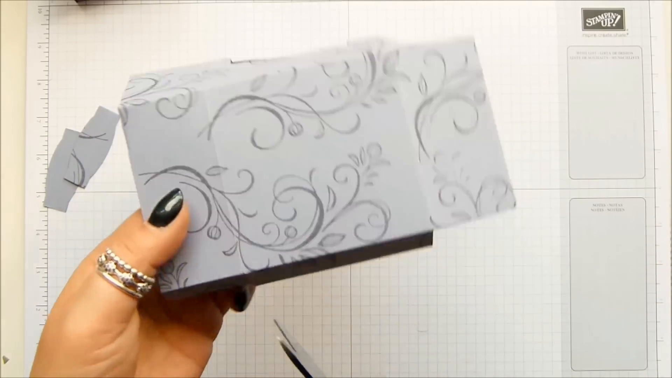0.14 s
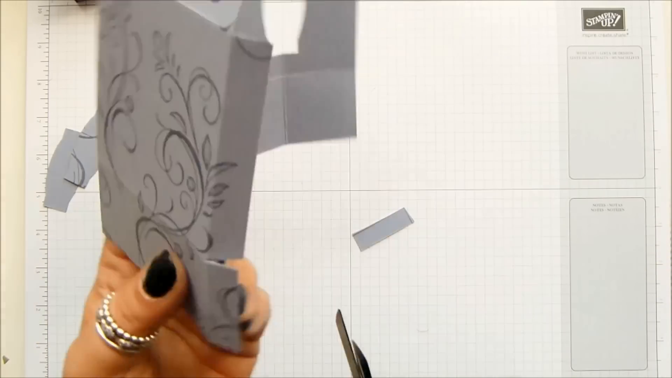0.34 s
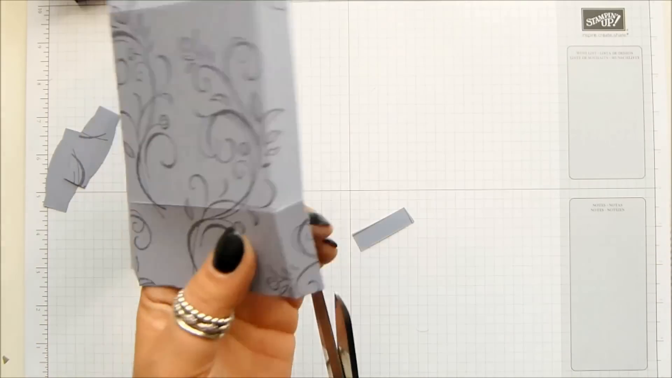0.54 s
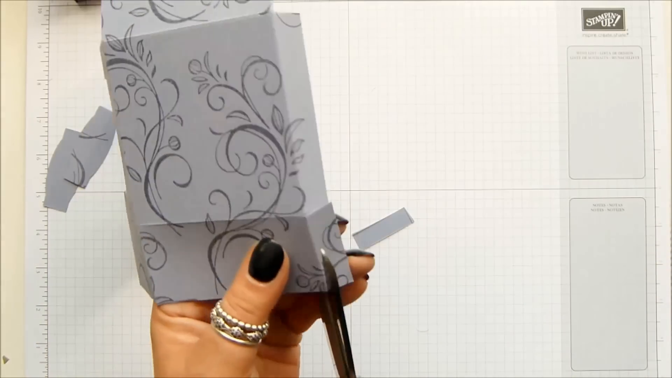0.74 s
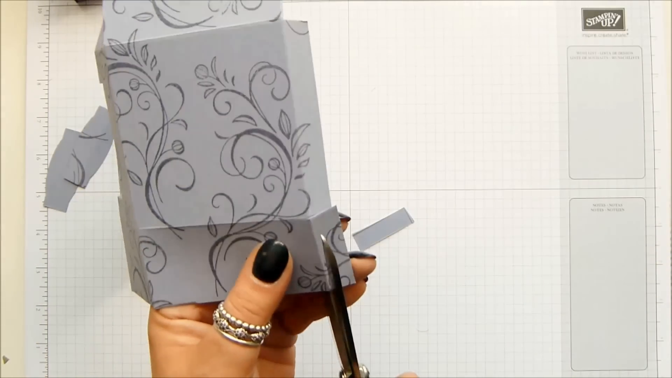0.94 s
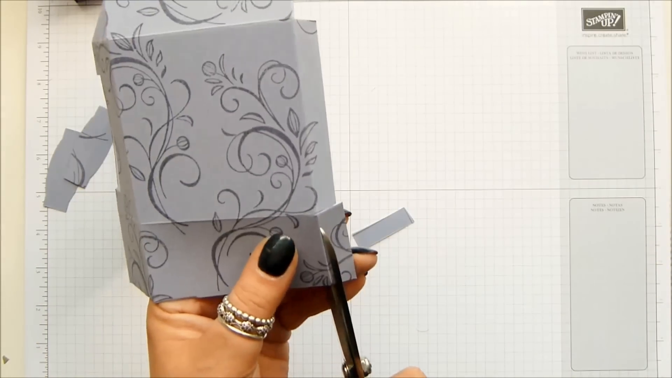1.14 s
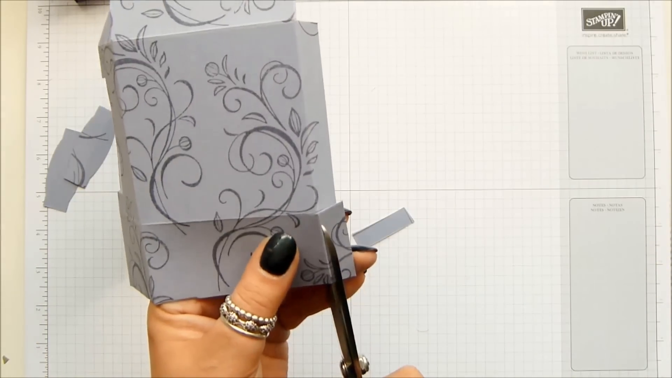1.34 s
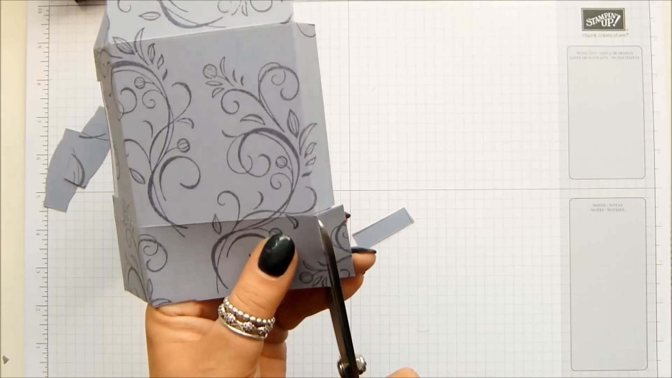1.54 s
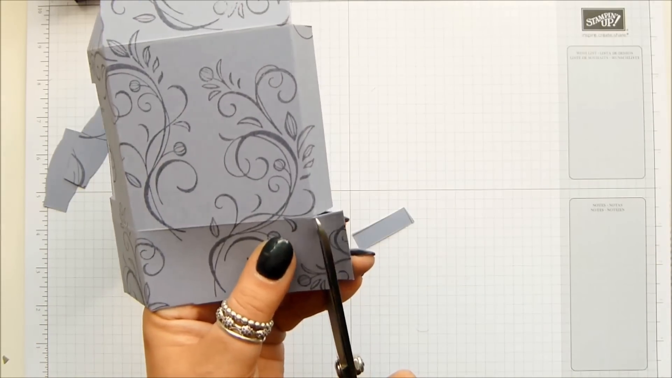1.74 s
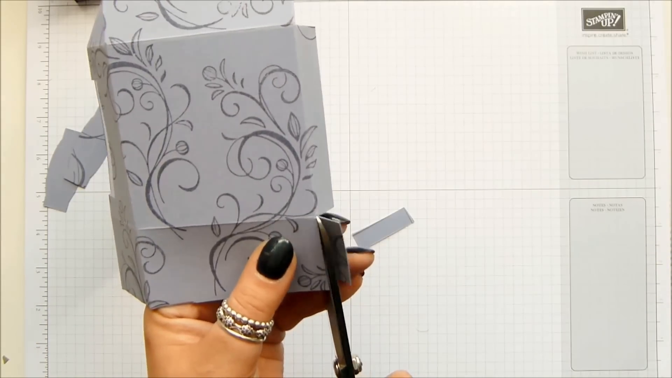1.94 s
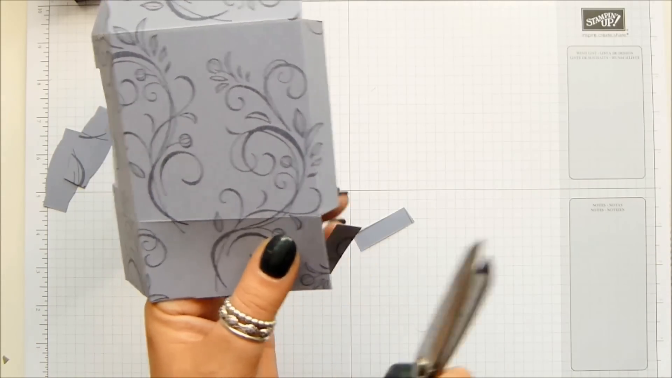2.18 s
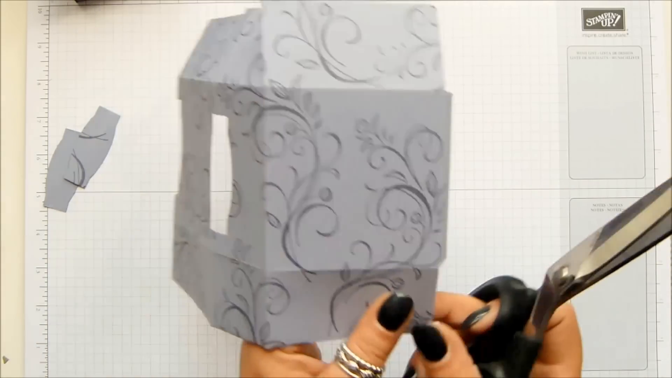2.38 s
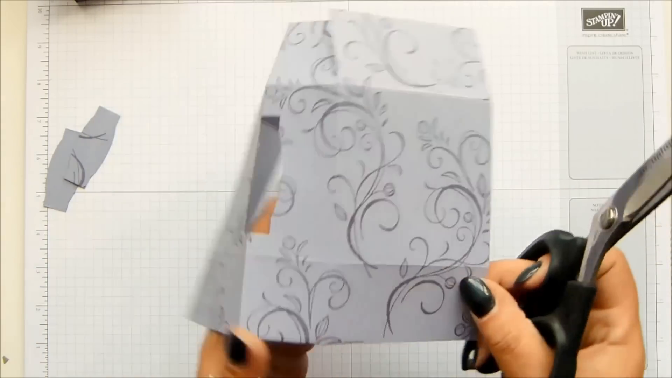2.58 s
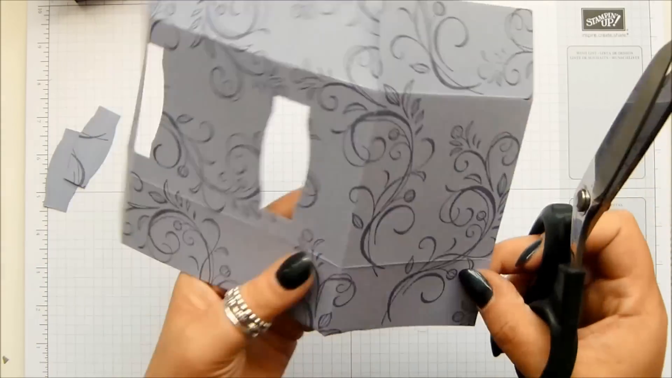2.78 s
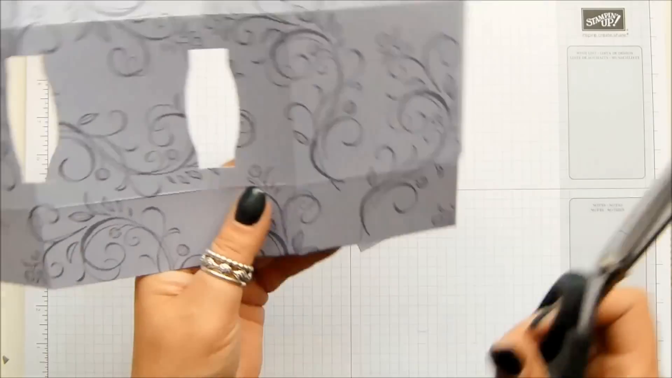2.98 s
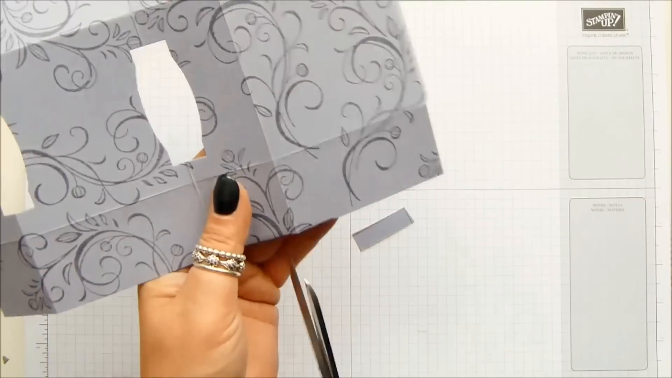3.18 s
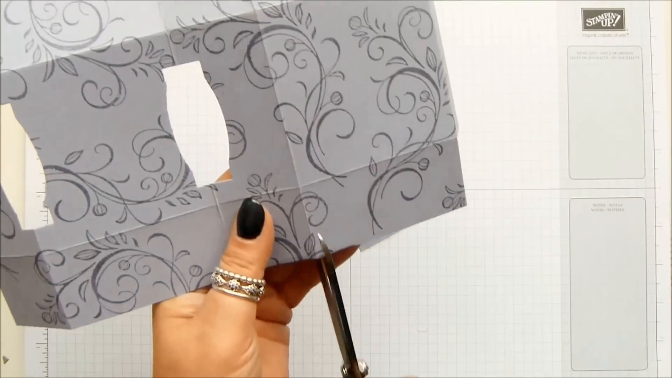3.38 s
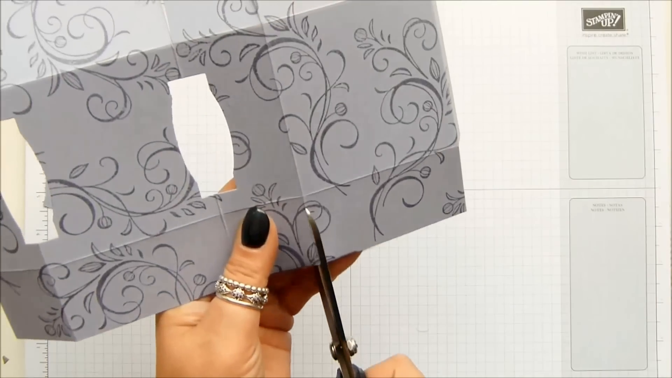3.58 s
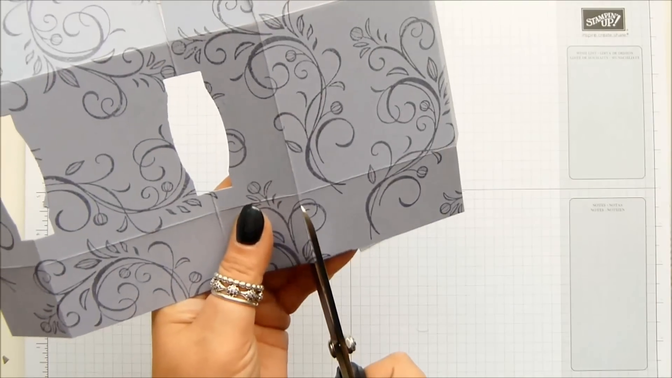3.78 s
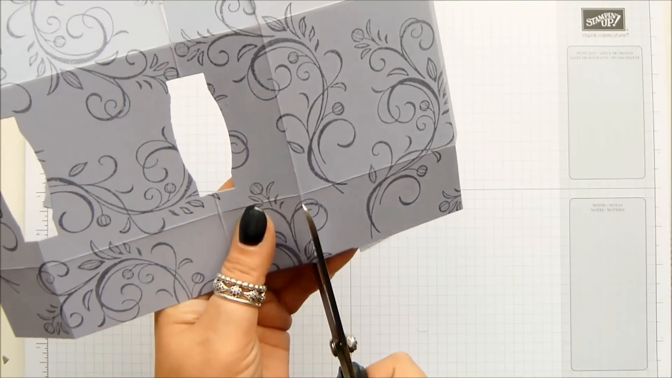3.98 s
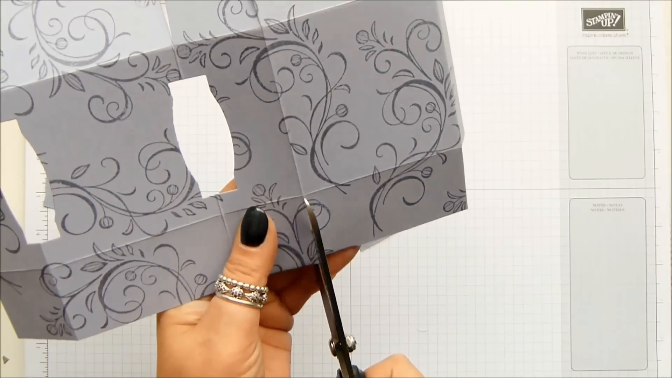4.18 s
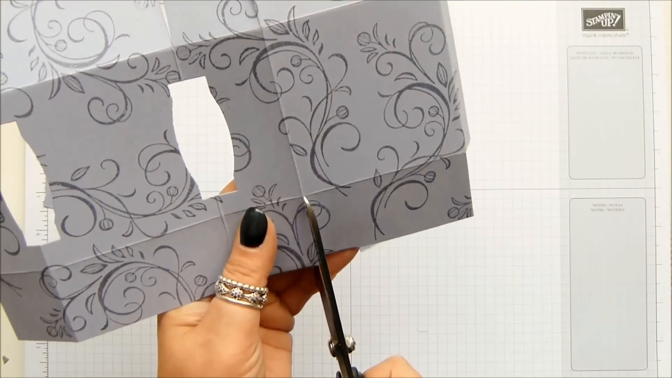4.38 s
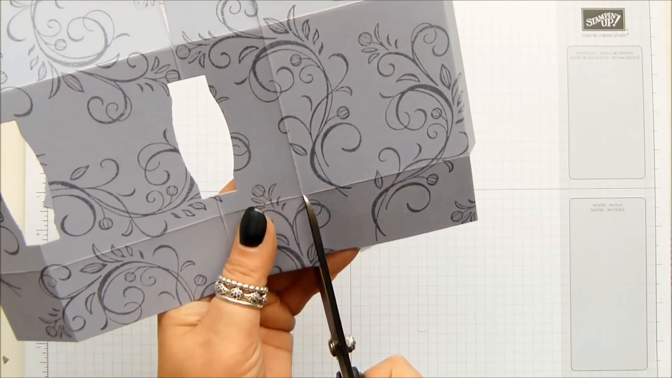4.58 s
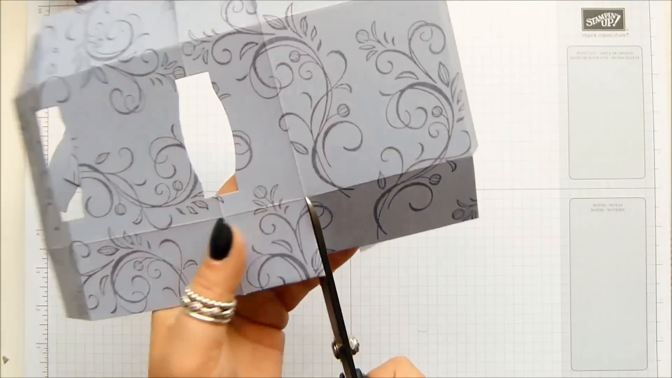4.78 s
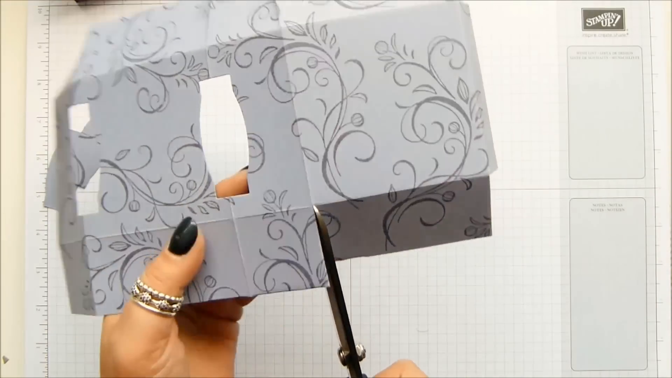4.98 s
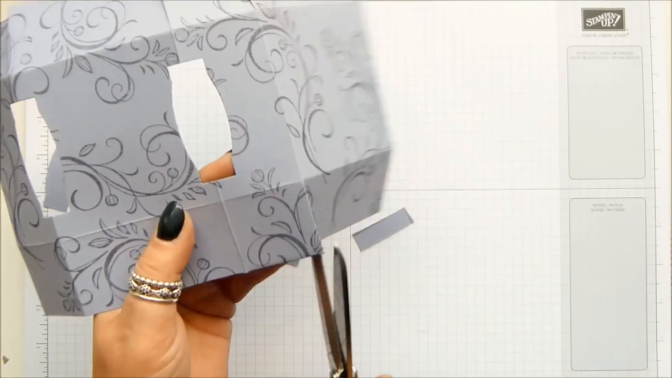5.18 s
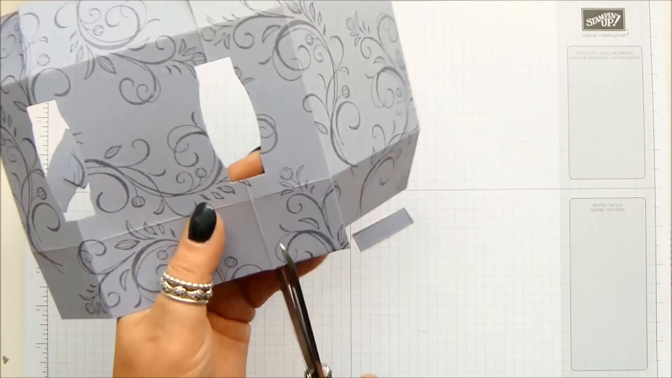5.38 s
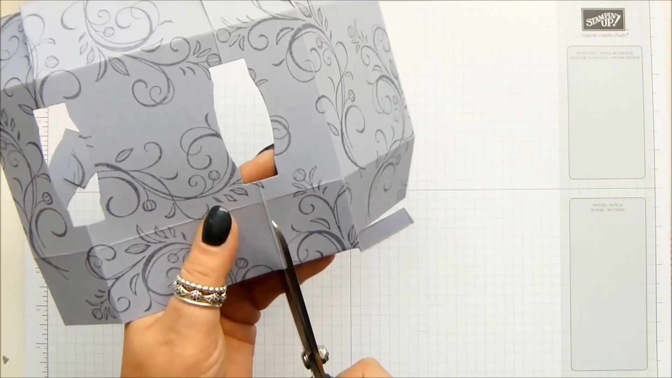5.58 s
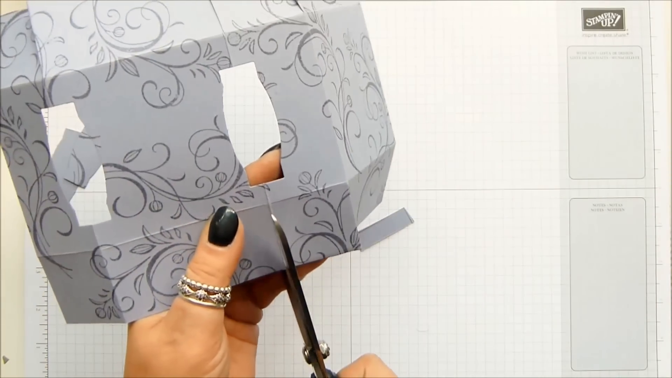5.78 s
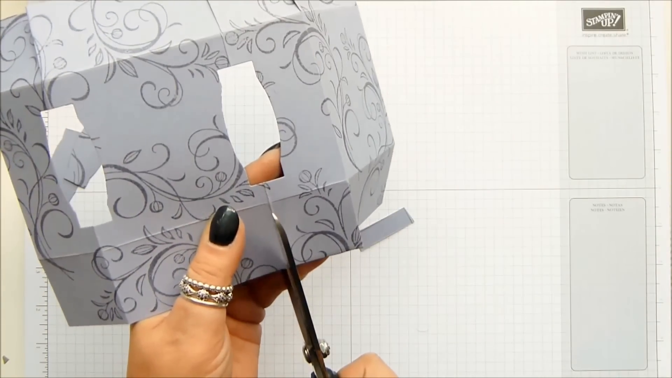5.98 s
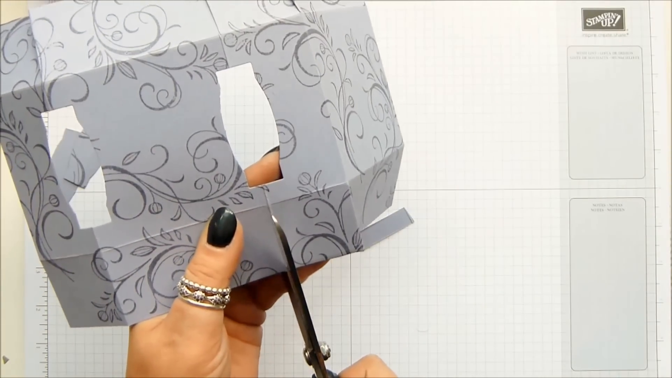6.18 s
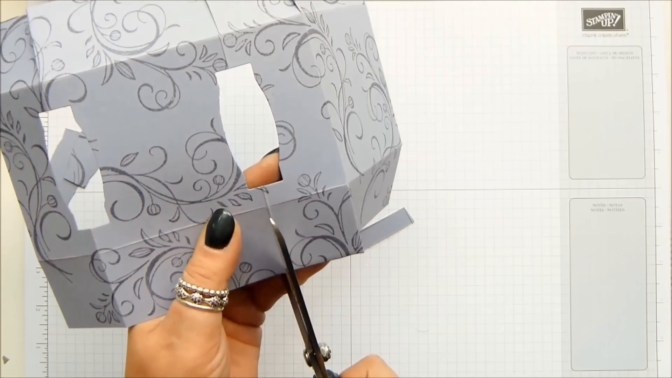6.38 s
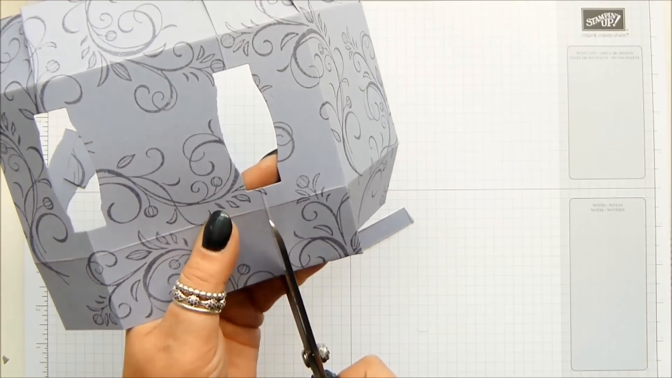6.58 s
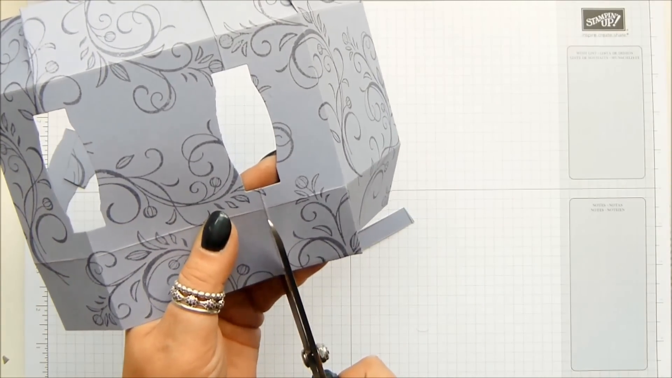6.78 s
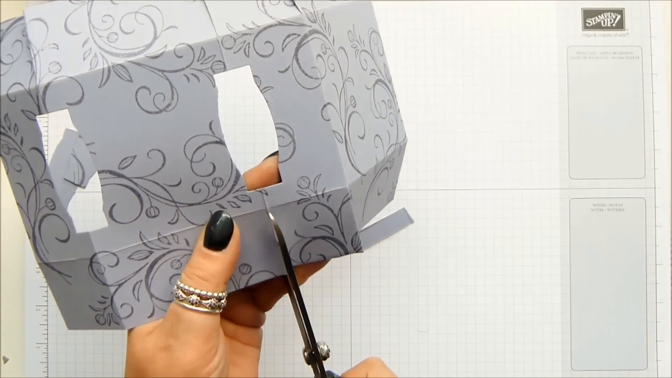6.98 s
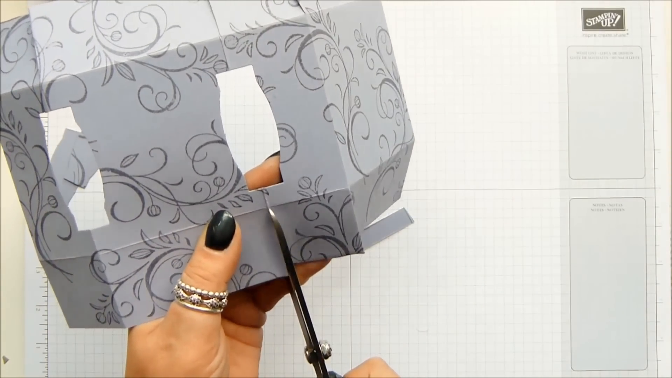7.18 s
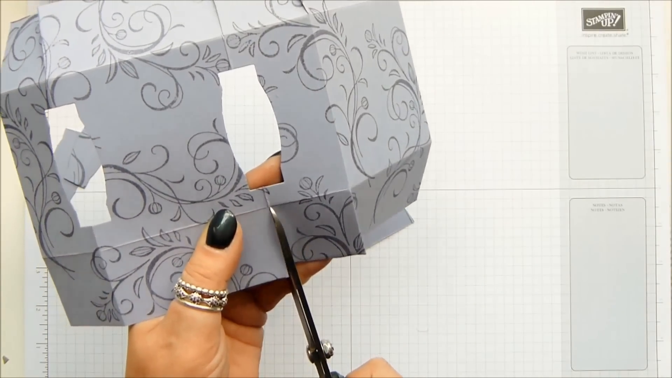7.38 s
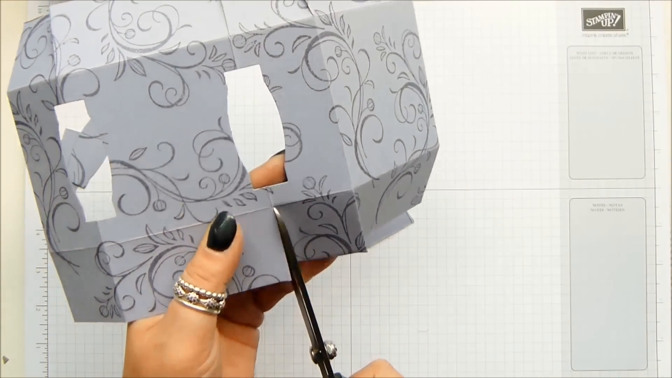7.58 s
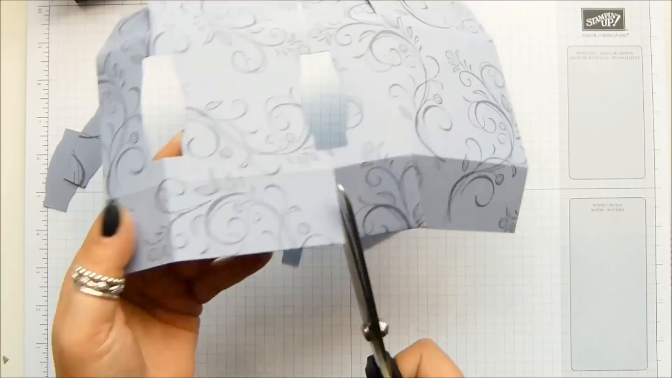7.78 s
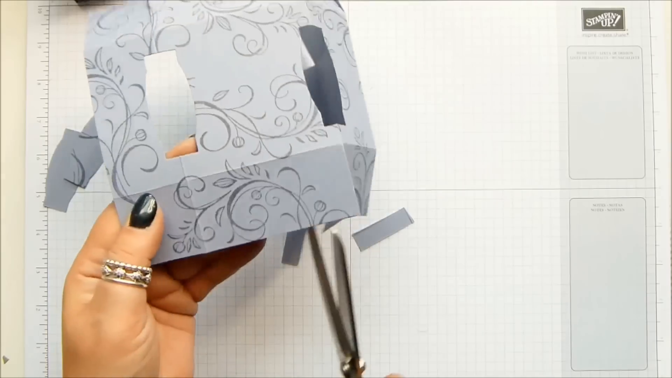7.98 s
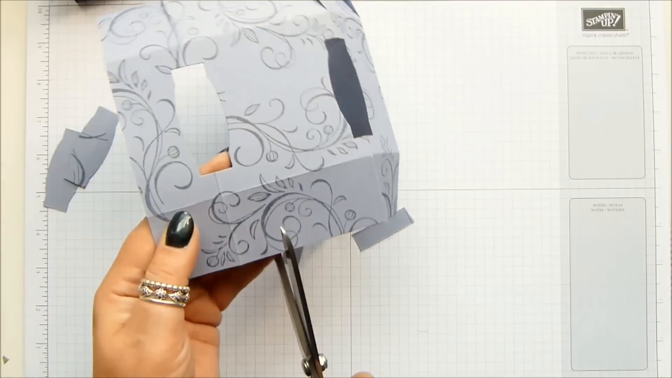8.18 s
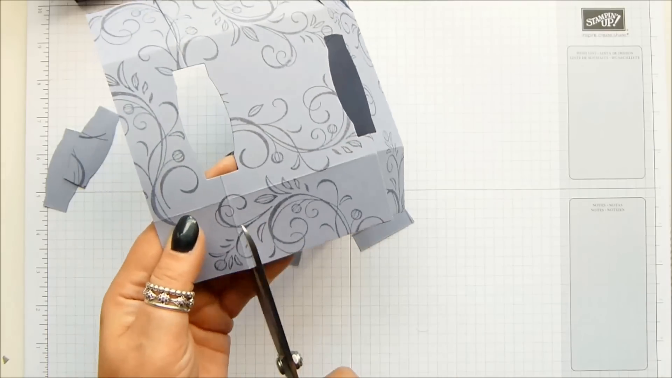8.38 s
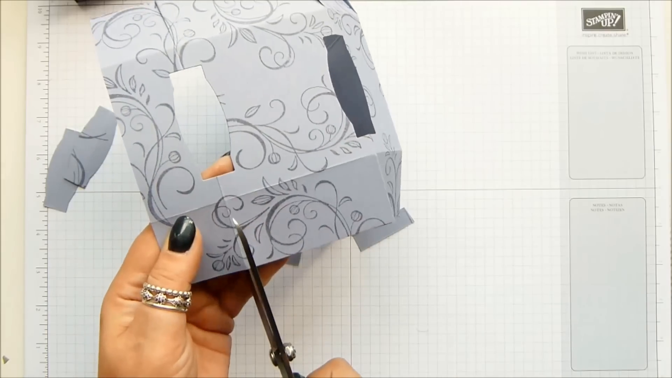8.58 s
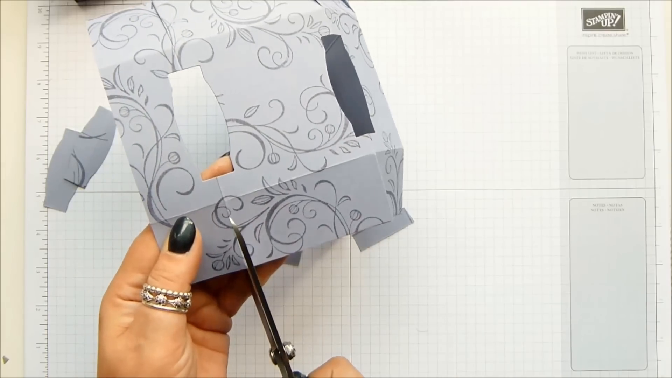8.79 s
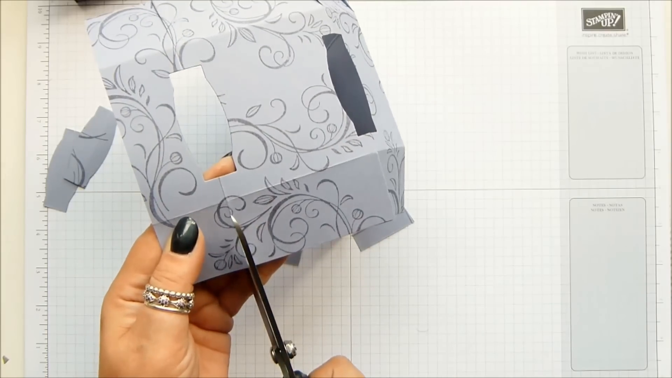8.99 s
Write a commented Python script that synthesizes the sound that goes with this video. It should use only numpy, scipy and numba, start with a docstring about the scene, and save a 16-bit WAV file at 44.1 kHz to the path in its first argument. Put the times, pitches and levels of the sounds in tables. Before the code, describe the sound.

Close stereo pickup in a small, quiet room. A hollow box of stiff card is turned with quick papery scrapes, dull finger knocks and sharp crease snaps. Scissors make three gritty, slightly rising cuts, the later two longer and crackling. Between them come more rustles, a hard pop near the first third, and near-silent pauses with faint hiss and low hum.

```python
"""In a quiet room, over a table, a folded cardstock box is turned in the hands and trimmed with scissors.
Card fibres tear and rub as thousands of tiny random clicks, which ring the hollow box, the panel and the blades.
Knocks add a dull push, and snaps are single clicks scattered into crackle. Short noisy echoes follow.
Below lie room hiss (noise in bands), far traffic (low noise) and a faint wavering hum (one tone)."""
import sys
import numpy as np
from scipy import signal
from scipy.io import wavfile
from numba import njit

SR = 44100
rng = np.random.default_rng(int(sys.argv[2]) if len(sys.argv) > 2 else 0)


def master(y):
    """Save y as 16-bit WAV."""
    cut = np.clip(np.atleast_2d(y).T, -1, 1)
    pcm = np.round(cut * 32767)  # scale
    wavfile.write(sys.argv[1], SR, pcm.astype(np.int16))


N = 399105

CREST_DB = 13.5  # how far the peaks of a burst of grains stand above its rms
BEND_PER_S, BEND_DB = 14, 2.2  # bending card: each resonance swells and sinks; rate and the panel's depth


def from_db(db):
    """Turn decibels into a gain."""
    return 10 ** (np.asarray(db) / 20)


def rms_one(x):
    """Scale a sound to rms 1."""
    return x / np.sqrt(np.mean(x ** 2) + 1e-20)


def band(x, order, low_hz, high_hz):
    """Keep mainly the sound between two frequencies."""
    return signal.sosfilt(signal.butter(order, [low_hz, high_hz], "band", fs=SR, output="sos"), x)


def in_time(rows):
    """Read every column of a table of curves at each sample; the first column is time."""
    s, *columns = np.transpose(rows)
    return [np.interp(np.arange(N) / SR, s, c) for c in columns]


def at_hz(points, hz):
    """Read a spectrum table on a log-frequency axis."""
    table_hz, values = np.transpose(points)
    return np.interp(np.log(hz), np.log(table_hz), values)


def drift(rate):
    """Slow random wandering of spread 1 that changes about rate times a second."""
    step = 20  # samples between computed points
    r = np.exp(-2 * np.pi * rate * step / SR)
    noise = rng.standard_normal(N // step + 4002)
    slow = signal.lfilter([1], [1, -2 * r, r * r], noise)[4000:]  # drop the settling time
    return np.interp(np.arange(N) / step, np.arange(len(slow)), rms_one(slow))


def resonate(x, modes, bend_db):
    """Ring several resonances side by side, each wandering in strength on its own."""
    out = 0
    for k, (hz, width_hz, level_db) in enumerate(modes):
        r = np.exp(-np.pi * width_hz / SR)
        feedback = [1, -2 * r * np.cos(2 * np.pi * hz / SR), r * r]
        ringing = signal.lfilter(np.array([1, 0, -1]) * (1 - r * r) / 2, feedback, x)
        gain = from_db(level_db + bend_db * drift(BEND_PER_S))
        out = out + (-1) ** k * gain * ringing
    return out


@njit
def glide(x, cosine, r):
    """Ring a resonance whose centre moves from sample to sample."""
    y = np.zeros_like(x)
    for c in range(x.shape[0]):
        for i in range(2, x.shape[1]):
            push = (1 - r * r) / 2 * (x[c, i] - x[c, i - 2])
            y[c, i] = push + 2 * r * cosine[i] * y[c, i - 1] - r * r * y[c, i - 2]
    return y


def moving_peak(x, hz, width_hz, level_db):
    """Ring a resonance that follows the curve hz."""
    return from_db(level_db) * glide(x, np.cos(2 * np.pi * hz / SR), np.exp(-np.pi * width_hz / SR))


def swells(s, peak_db, t60, rise):
    """Add up loudness curves that climb for a share of their decay time (rise), then die away."""
    out = np.zeros(N)
    for start, gain, length in zip(s, from_db(peak_db - CREST_DB), t60):
        i = round(start * SR)
        t = np.arange(min(int(length * SR), N - i)) / SR / length
        shape = (1 - np.exp(-t / rise)) * from_db(-60 * t)
        out[i:i + len(t)] += gain * shape / shape.max()
    return out


AIR_DB = -60  # rms of the whole hiss
# colour of the room hiss, relative: f/Hz, level per Hz/dB
AIR_COLOUR = [(47, -29), (80, -12), (139, -10), (178, -9.5), (277, -17), (431, -14), (700, -17),
              (880, -8.5), (1150, -17.5), (1400, -19), (2040, -20.5), (2600, -19.5), (4830, -22),
              (11000, -26), (16000, -27.5)]
# how alike the hiss is left and right: f/Hz, likeness (1 same, 0 unrelated, below 0 opposed)
AIR_LIKENESS = [(60, 1), (240, 0.81), (950, 0.22), (3770, -0.41), (15000, 0.029)]


def air():
    """Room hiss: third-octave bands of noise, each wavering a little, alike on both sides in the bass."""
    out, edges = 0, 75 * 2 ** np.arange(0, 7.9, 1 / 3)
    white = rng.standard_normal((2, 2, N))
    for k, (low, high) in enumerate(zip(edges, edges[1:])):
        mid, side = band(white[k % 2], 2, low, high)  # neighbouring bands use different noise
        hz = np.sqrt(low * high)
        alike = np.clip(at_hz(AIR_LIKENESS, hz), -1, 1)
        stereo = np.sqrt(1 + alike) * mid + np.sqrt(1 - alike) * side * [[1], [-1]]
        out = out + from_db(at_hz(AIR_COLOUR, hz) + 2.06 * drift(2.6)) * stereo
    return from_db(AIR_DB) * rms_one(out)


# far traffic sinking and swelling: t/s, level/dB (rms)
RUMBLE = [(0.0, -67), (0.85, -76.5), (9.05, -65)]


def rumble():
    """Far traffic: low noise through the walls, nearly the same on both sides."""
    mid, side = band(rng.standard_normal((2, N)), 3, 38, 70)
    return from_db(in_time(RUMBLE)[0]) * rms_one(mid + from_db(-27.0) * side * [[1], [-1]])


CLIMB_DB_PER_S, FADE_DB_PER_S = 613, 342  # before and after every cut or rub
SCRAPE_AT_PIVOT_HZ, SCRAPE_AT_TIPS_HZ = 5700, 7530  # the scrape rises as the blades close
HISS_AT_PIVOT_DB, HISS_AT_TIPS_DB = -7.5, 2.5  # blade hiss setting at the start and end of a cut
CHATTER_PER_S, CHATTER_DB = 24, 0.28  # in a cut the edge jerks forward: rate and depth of the swing
# card rubs on fingers, blades and table: start t/s, length t/s, drive level/dB, growth level/dB,
# free flap f/Hz, hollow box drive level/dB, scrape f/Hz, blade hiss setting level/dB
RUBS = [(0, 0.041, -32, 0, 1424, -9.5, 4700, -6), (0.127, 0.01, -37.5, -9, 1660, -7, 5940, -1),
        (0.212, 0.035, -43, 3.5, 2370, -9, 2880, -3.5), (0.309, 0.037, -44, -8, 2250, 4, 3750, -0.5),
        (0.363, 0.066, -45.5, -4, 1540, -5.5, 7400, 7), (0.474, 0.024, -52.5, -9, 2190, 0, 7250, 9),
        (0.494, 0.078, -54.5, -1, 2350, -3.5, 6750, -1), (0.64, 0.072, -39.5, 2, 2040, -4, 5500, -6.5),
        (0.805, 0.098, -44.5, -3, 2070, -8.5, 3760, -9.5), (0.942, 0.032, -61.5, 5.5, 2140, 4, 4500, -16),
        (1.066, 0.037, -62, -6, 2170, 5.5, 3100, -17), (1.169, 0.033, -59.5, -2.5, 1920, 2, 4700, -2.5),
        (1.273, 0.024, -61.5, -3, 1530, -1, 4830, -6), (1.367, 0.049, -63.5, 8, 1710, -4, 5060, -4),
        (1.696, 0.038, -50.5, -0.5, 2080, -4, 6600, 2), (1.84, 0.067, -54.5, 0, 2140, -3.5, 7200, 6.5),
        (2.032, 0.14, -50.5, -9.5, 1530, -0.5, 5400, 0), (2.2, 0.075, -65.5, 3.5, 2010, -8, 5800, -1.5),
        (2.337, 0.15, -51, 7.5, 1550, -8, 6460, -5), (2.528, 0.12, -44, 3.5, 1630, -7, 8000, 3.5),
        (2.706, 0.044, -39.5, 0, 1440, -1, 3480, -5), (2.76, 0.16, -49.5, 2, 2310, 2.5, 3160, 1),
        (3.045, 0.22, -66, 1.5, 2280, 0, 5000, 0.5), (4.716, 0.019, -64, 6.5, 1645, -2, 5960, -3),
        (4.772, 0.071, -57.5, -2, 1710, -12, 6050, -1.5), (4.847, 0.12, -56.5, 11, 1670, -4, 5500, -0.5),
        (5.136, 0.024, -48.5, 4, 1720, -1.5, 4900, -7), (5.269, 0.012, -33, 1.5, 1650, -7.5, 4450, -3),
        (5.335, 0.11, -55, 10.5, 1620, -2.5, 4240, -2.5), (5.663, 0.029, -53, -2, 1570, -3.5, 4740, -8.5),
        (5.761, 0.02, -48, -7, 1690, -5, 4760, -9), (5.82, 0.084, -64.5, -2, 1640, 2, 4760, -10),
        (6.15, 0.091, -60, -10, 1940, -11, 4420, -2.5), (7.495, 0.037, -60.5, -11, 1480, 14, 5570, -1),
        (7.628, 0.17, -47, -0.5, 1680, -6, 3460, -2.5), (7.794, 0.11, -49, 7.5, 2030, -3, 3415, -7),
        (7.958, 0.037, -46, 11, 2080, -6.5, 4350, -1.5), (8.038, 0.039, -61, 13, 2090, -3, 3430, -7),
        (8.121, 0.19, -54, -5, 2030, -2.5, 3420, 0.5), (8.298, 0.06, -62.5, 12, 2163, -3.5, 4500, -8),
        (8.439, 0.12, -53.5, -8.5, 1890, -4, 3600, -3.5)]
# the blades close through the card: the first six columns of the rubs
CUTS = [(1.455, 0.32, -49, -9.5, 2150, -11.5), (4.048, 0.53, -53.5, -4, 1510, -7.5),
        (6.842, 0.568, -50.5, -4.5, 1610, -2.5)]


def strokes():
    """Cuts and rubs climb, grow or sag, and fade; pitch and colour are averages, louder strokes counting more."""
    t = np.arange(0, N / SR, .001)
    closing = SCRAPE_AT_PIVOT_HZ, HISS_AT_PIVOT_DB, SCRAPE_AT_TIPS_HZ, HISS_AT_TIPS_DB, CHATTER_DB
    # a rub ends with the pitch and hiss it began with, and does not chatter
    rows = [(*row, *closing) for row in CUTS] + [(*row, *row[-2:], 0) for row in RUBS]
    (s, length, level_db, growth_db, flap_hz, box_db,
     hz, hiss_db, last_hz, last_hiss_db, jerk_db) = np.transpose(rows)[:, :, None]
    along = np.clip((t - s) / length, 0, 1)
    before, after = np.maximum(s - t, 0), np.maximum(t - s - length, 0)
    edge_db = CLIMB_DB_PER_S * before + FADE_DB_PER_S * after
    gain = from_db(level_db + growth_db * along - np.minimum(edge_db, 200))
    share = gain / gain.sum(axis=0)
    scrape_hz = hz + (last_hz - hz) * along
    blade_db = hiss_db + (last_hiss_db - hiss_db) * along
    columns = flap_hz, box_db, scrape_hz, blade_db, jerk_db
    mixed = [(share * c).sum(axis=0) for c in columns]
    return in_time(np.transpose([t, gain.sum(axis=0), *mixed]))


def grains(per_s, spread_db):
    """Fibres let go at random, a few much harder than the rest; one row is centred, one spread sideways."""
    sizes = from_db(spread_db * np.minimum(rng.exponential(1, (2, N)), 4)) * rng.choice([-1, 1], (2, N))
    return rms_one(sizes * (rng.random((2, N)) < per_s / SR))


# resonances of the hollow box: f/Hz, width f/Hz, relative level/dB
BOX = [(154, 126, -11.5), (263, 115, -4.5), (327.5, 57, -0.5), (414.4, 27.6, 0.5), (518, 47.4, 1),
       (656, 92, -5), (761, 44, -4.5), (924, 63, -0.5)]


def ring_box(drive):
    """The hollow box booms at its low resonances."""
    # narrow resonances pass little of the grains' energy, so the lower bodies need more gain
    return from_db(14.0) * resonate(drive, BOX, bend_db=1.5)


FLAP_WIDTH_HZ, FLAP_DB = 105, 14
FLAP_WANDER_HZ = 40  # the flap's pitch shifts as it bends
# resonances of the cut panel: f/Hz, width f/Hz, relative level/dB
PANEL = [(1400, 204, 2.5), (1603, 135, 4.8), (1914, 406, 1.2), (2337, 117, 5.7), (2462, 223, 2.5),
         (3364, 965, 0.39)]


def ring_panel(drive, flap_drive, flap_hz):
    """The cut panel rings at fixed pitches, its free flap at a pitch that moves."""
    wandering_hz = flap_hz + FLAP_WANDER_HZ * drift(BEND_PER_S)
    flap = moving_peak(flap_drive, wandering_hz, FLAP_WIDTH_HZ, FLAP_DB)
    return from_db(2.0) * (resonate(drive, PANEL, BEND_DB) + flap)


SCRAPE_WIDTH_HZ, SCRAPE_DB = 650, 4.5
# resonances of the blades: f/Hz, width f/Hz, relative level/dB
BLADES = [(3573, 100, 1.5), (4460, 1230, -0.5), (6380, 2930, 3), (8950, 4400, 2), (13300, 3600, -2)]


def ring_blades(drive, scrape_drive, scrape_hz):
    """The blades hiss through broad high resonances, with a scrape that changes pitch."""
    scrape = moving_peak(scrape_drive, scrape_hz, SCRAPE_WIDTH_HZ, SCRAPE_DB)
    return from_db(2.5) * (resonate(drive, BLADES, bend_db=1.2) + scrape)


FLAP_DB_PER_HISS_DB = -.7  # dull, slow rubbing leaves the flap free to ring
PANEL_DB_PER_HISS_DB = .5  # and stirs the rest of the panel less


def card():
    """Grains from the shearing edge drive box, panel and blades; returns mid and side."""
    stroke, flap_hz, box_db, scrape_hz, blade_db, jerk_db = strokes()
    slip = slips()
    stutter_db = 1.4 * drift(90)  # the edge sticks and slips many times a second
    rub = stroke * from_db(stutter_db + jerk_db * drift(CHATTER_PER_S))
    fibres, other_fibres = grains(per_s=5000, spread_db=1.5), grains(per_s=5400, spread_db=1.0)
    # sparser, harder grains break among the rest, slightly louder under the blades
    fibres = fibres + from_db(4 * jerk_db - 13) * grains(per_s=260, spread_db=3)
    box_drive = (rub * from_db(box_db) + from_db(-7.5) * slip) * fibres + knocks(other_fibres)
    shear = from_db(PANEL_DB_PER_HISS_DB * blade_db + 2.0) * rub + slip
    flap = from_db(FLAP_DB_PER_HISS_DB * blade_db - 10.0) * rub + slip
    hiss = (rub + from_db(-4.0) * slip) * from_db(blade_db)
    scrape = from_db(4 * jerk_db - 4) * hiss  # the scrape gets slightly more drive under the blades
    panel = ring_panel(shear * fibres, flap * other_fibres, flap_hz)
    blades = ring_blades(hiss * fibres, scrape * other_fibres, scrape_hz)
    return ring_box(box_drive) + panel + blades


ROOM_T60_S, ROOM_DB = 0.13, -10.5  # time for echoes to fall 60 dB, and their level


def room(x):
    """Diffuse echoes: fading noise, different on each side and thin in the bass."""
    t = np.arange(int(.4 * SR)) / SR
    tail = rng.standard_normal((2, len(t))) * from_db(-60 * t / ROOM_T60_S) * (t > .004)
    tail = band(tail, 2, 800, 10000)
    tail = tail / np.sqrt(np.sum(tail ** 2, axis=1, keepdims=True))
    return from_db(ROOM_DB) * signal.fftconvolve(x[None], tail, axes=1)[:, :N]


FINGER_HZ = 810  # a soft fingertip drives only the low resonances
THUD_DB = 5  # the first push of a knock is heard directly; gain over the knock setting
# dull knocks on the hollow box: t/s, peak setting level/dB, time to fall 60 dB t/s
KNOCKS = [(0.072, -28.5, 0.037), (0.232, -25.5, 0.022), (0.3113, -18, 0.04), (0.653, -30, 0.17),
          (1.983, -26.5, 0.063), (2.039, -28.5, 0.052), (2.492, -35, 0.052), (2.7352, -1.5, 0.012),
          (2.758, -18.5, 0.12), (2.907, -22, 0.031), (4.951, -33.5, 0.093), (5.113, -33, 0.083),
          (5.145, -32, 0.071), (5.252, -30, 0.02), (5.322, -22.5, 0.057), (6.834, -31.5, 0.033),
          (7.613, -33, 0.11), (7.644, -28, 0.035), (7.838, -28, 0.068), (7.852, -23, 0.09),
          (7.951, -29.5, 0.07)]


def knocks(fibres):
    """A fingertip's short bursts of dull grains, which then drive the box."""
    return from_db(6.5) * band(swells(*np.transpose(KNOCKS), rise=0.0093) * fibres, 2, 240, FINGER_HZ)


def thuds():
    """Each knock begins with one blunt inward pulse."""
    s, peak_db, _ = np.transpose(KNOCKS)
    clicks = np.zeros(N)
    clicks[np.round(s * SR).astype(int)] = -from_db(peak_db + THUD_DB)
    return band(clicks + 1e-18, 1, 110, 1800)


SLIP_T60_S = 0.039  # time for a slip to fall 60 dB
# slips of the blades and flicks of the sheet: t/s, peak drive level/dB
SLIPS = [(0.278, -34), (0.299, -32), (0.3112, -22), (0.561, -48), (0.622, -24), (0.7946, -33.5),
         (0.899, -47), (1.165, -46), (1.279, -38), (1.5584, -33.5), (1.579, -34), (1.619, -37),
         (1.826, -26), (1.8684, -29), (1.9847, -27), (2.0328, -28.5), (2.0748, -28.5), (2.1596, -34),
         (2.3273, -31), (2.356, -20.5), (2.5416, -31.5), (2.598, -38), (2.643, -36), (2.698, -41),
         (2.7332, -14), (2.8123, -32), (2.838, -25.5), (2.896, -26.5), (2.909, -37), (2.958, -35.5),
         (3.1605, -43.5), (3.5494, -48), (3.618, -41), (3.669, -44), (4.006, -40), (4.0228, -38),
         (4.053, -30), (4.075, -45), (4.0895, -30), (4.101, -51), (4.119, -38), (4.1916, -35),
         (4.2145, -31.5), (4.2444, -33), (4.3031, -42), (4.335, -39), (4.372, -33.5), (4.394, -41),
         (4.4124, -32.5), (4.459, -31.5), (4.482, -32.5), (4.521, -35), (4.536, -39), (4.553, -38),
         (4.568, -40), (4.7426, -40), (4.774, -38), (4.792, -37), (5.06, -39), (5.115, -37), (5.155, -38),
         (5.23, -37), (5.2535, -30), (5.36, -28.5), (5.478, -32.5), (6.153, -40), (6.866, -37.5),
         (6.9461, -36), (7.0093, -27), (7.064, -32.5), (7.1114, -31.5), (7.133, -32.5), (7.166, -28),
         (7.177, -33), (7.209, -25.5), (7.232, -27), (7.261, -32), (7.3305, -40), (7.35, -43),
         (7.3614, -26), (7.41, -40), (7.4825, -34), (7.4973, -23.5), (7.5991, -39), (7.6465, -30.5),
         (7.742, -48), (7.8381, -23.5), (8.125, -32.5)]


def slips():
    """Short swells of grain strength as the blades slip or the sheet flicks."""
    return swells(*np.transpose(SLIPS), np.full(len(SLIPS), SLIP_T60_S), rise=0.1)


# sharp snaps of creases and blade tips: t/s, click level before filtering/dB
SNAPS = [(0.3143, -7.5), (0.5884, -21.5), (0.6231, -8.5), (1.8272, -19), (1.8706, -33), (1.985, -26),
         (2.357, -28), (2.736, -17.5), (4.4155, -32), (4.488, -24), (4.537, -26), (4.554, -25),
         (4.746, -26), (5.0601, -22), (5.3294, -35), (5.3611, -19), (7.1168, -32), (7.177, -34),
         (7.192, -19), (7.21, -29), (7.246, -23), (7.4826, -23), (7.646, -27), (7.8381, -28), (8.298, -38),
         (8.636, -32)]


def snaps(scatter_s):
    """Each snap is one click that the sheet scatters into a few milliseconds of crackle."""
    s, peak_db = np.transpose(SNAPS)
    clicks = np.zeros(N)
    clicks[np.round(s * SR).astype(int)] = -from_db(peak_db)
    t = np.arange(int(.012 * SR)) / SR
    scatter = from_db(-16.5) * rng.standard_normal((2, len(t))) * np.exp(-t / scatter_s)
    scatter[0, 0] = 1  # the click itself, in the middle
    wide = signal.fftconvolve(clicks[None], scatter, axes=1)[:, :N]
    return band(wide, 1, 700, 6500)


# faint low hum, before it wavers: t/s, f/Hz, level/dB (rms)
HUM = [(0, 107.5, -109), (2.8, 106.2, -77), (3.23, 105.3, -71), (3.8, 98, -69), (4.03, 99.6, -75),
       (5.2, 100.3, -77), (5.5, 115, -71.5), (5.86, 119, -67), (6.01, 113, -82), (6.27, 114.3, -64),
       (6.67, 116.8, -77.5), (7.17, 110.3, -72.5), (7.8, 116.6, -71), (7.85, 109, -85), (7.9, 172.2, -92),
       (8.0, 174.3, -69), (8.55, 166, -69.5), (9.05, 174, -72)]


def hum():
    """A near-pure low tone that wavers in pitch and level."""
    hz, level_db = in_time(HUM)
    tone = np.sin(2 * np.pi * np.cumsum(hz + 1.06 * drift(5.4)) / SR)
    return np.sqrt(2) * from_db(level_db + 2.9 * drift(5.0)) * tone


PORTS_HZ = 9200  # above this the two microphone ports hear unlike sound


def scene():
    """Card in front of the microphones, its echoes, and the room."""
    mid, side = card() + snaps(scatter_s=0.0038)
    side = signal.sosfilt(signal.butter(1, PORTS_HZ, "high", fs=SR, output="sos"), side)
    mid = mid + thuds()
    return mid + side * [[1], [-1]] + room(mid) + air() + rumble() + hum()


DROOP_HZ, CUTOFF_HZ = 12600, 15650


def record(dry):
    """The microphone droops in the top octave, the right side is a little louder; the top is cut."""
    drooped = signal.sosfilt(signal.butter(2, DROOP_HZ, fs=SR, output="sos"), dry)
    balanced = drooped * from_db([[-.2], [.2]])
    return signal.sosfilt(signal.ellip(10, .5, 70, CUTOFF_HZ, fs=SR, output="sos"), balanced)


dry = scene()
out = record(dry)
master(out)
```